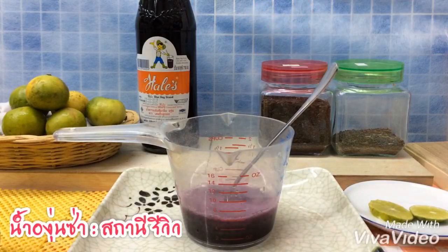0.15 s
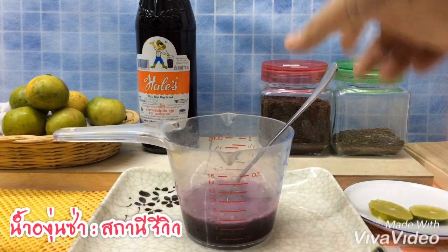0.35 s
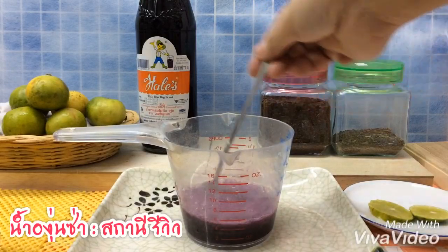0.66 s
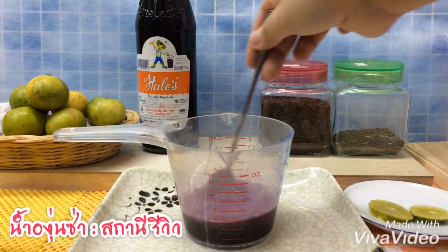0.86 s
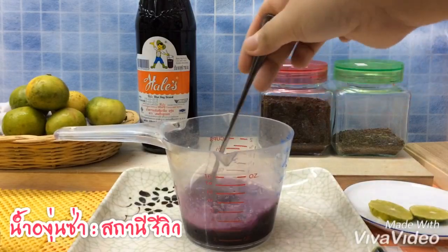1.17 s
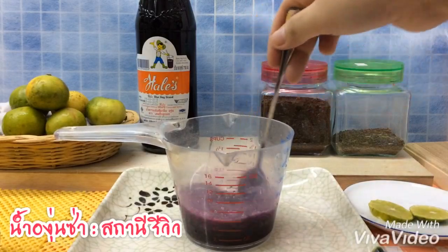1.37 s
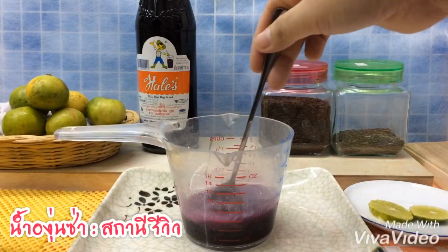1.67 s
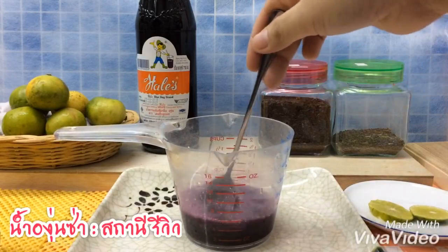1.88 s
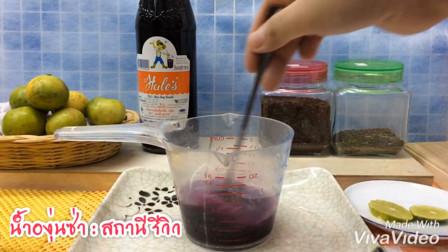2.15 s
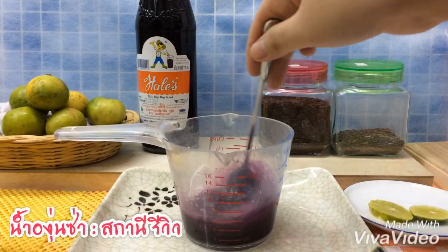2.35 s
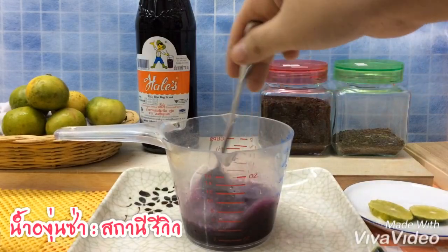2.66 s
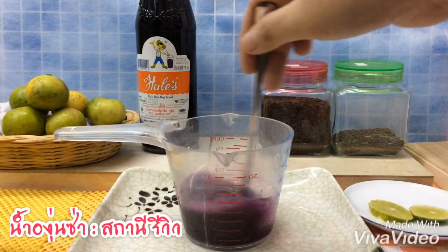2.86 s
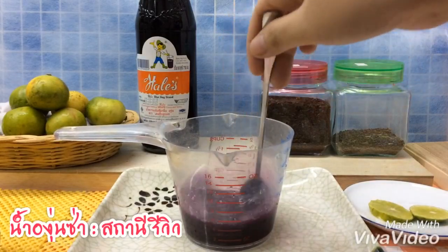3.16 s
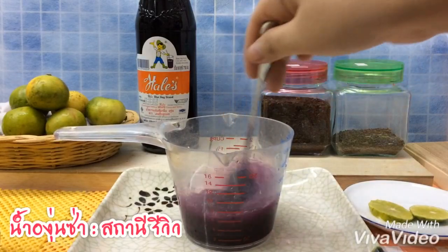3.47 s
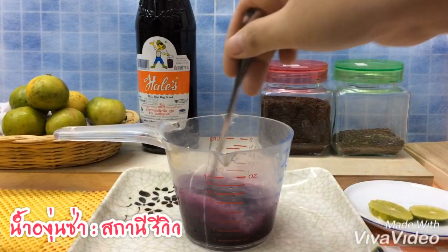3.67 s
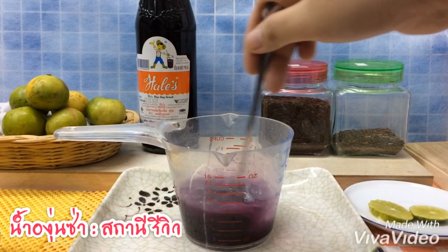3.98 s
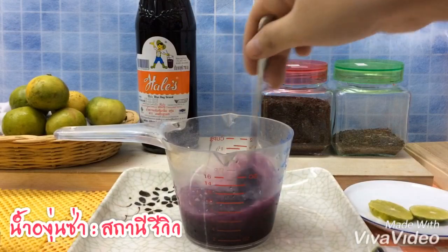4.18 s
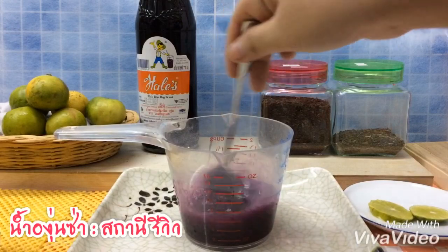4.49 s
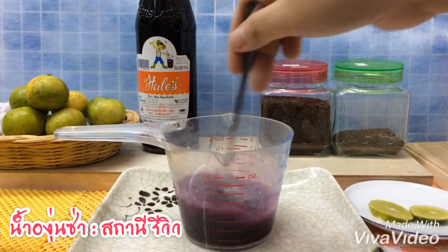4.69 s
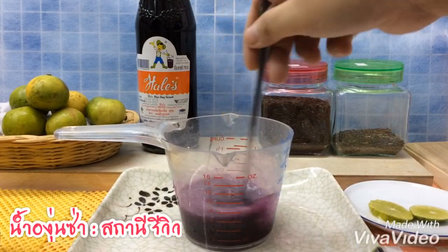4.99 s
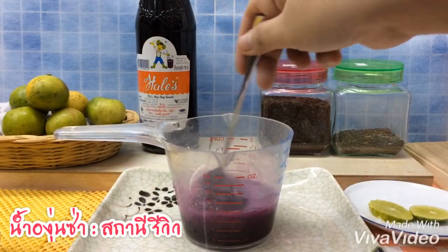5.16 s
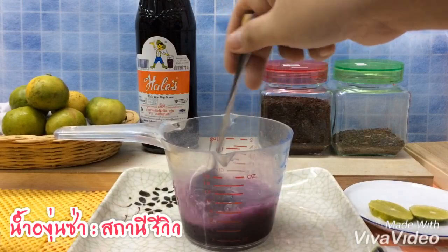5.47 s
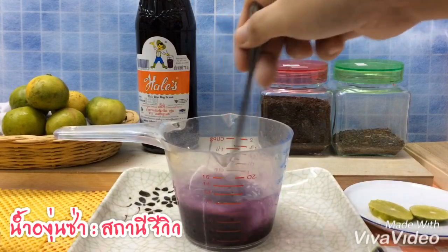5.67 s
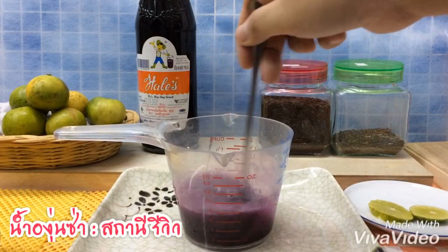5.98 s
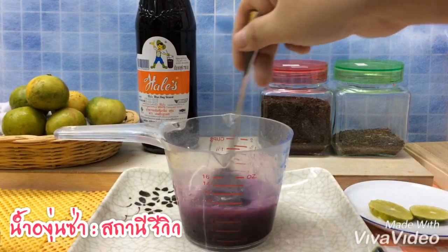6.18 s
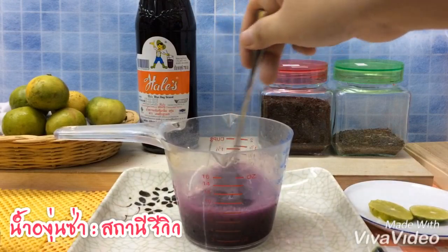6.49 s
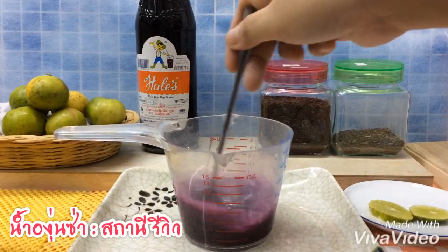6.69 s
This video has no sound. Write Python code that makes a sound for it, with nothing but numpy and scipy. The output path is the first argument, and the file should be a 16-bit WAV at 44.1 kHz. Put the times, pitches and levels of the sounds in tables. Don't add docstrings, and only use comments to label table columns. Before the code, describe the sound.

A close phone microphone in a tiled kitchen picks up deep, soft rumble and faint hiss. Nothing else stands out until about 0.7 s, when a long steel spoon is picked up: a bright, hard chink at 0.77 s, then quick, weaker ringing bounces and a scratchy slide until about 1 s. The spoon strikes the plastic jug at 1.0 and, harder, at 1.08 s, with a higher, dry clack. Stirring begins softly and unevenly, with a firmer knock at 2.53 s. From about 2.9 s it becomes steady, roughly six short drags per second, hollow and plasticky with liquid wash and gritty scraping. Irregular knocks and light taps ride on top, strong near 3.7, 4.06, 4.78, 5.42 (the loudest) and 6.77 s, with low tray thumps beneath. Tile reflections are brief. A faint distant motor hum rises after 6 s; stirring continues to the end, near 7 s.

```python
import sys
import numpy as np
from scipy import signal
from scipy.fft import rfft, irfft, next_fast_len
from scipy.io import wavfile

SR = 44100
rng = np.random.default_rng(int(sys.argv[2]) if len(sys.argv) > 2 else 0)


def master_out(mix):
    frames = np.transpose(np.atleast_2d(mix))
    ceiling = np.clip(frames, -1, 1)
    pcm = np.round(ceiling * 32767).astype(np.int16)
    wavfile.write(sys.argv[1], SR, pcm)


def field_ratio(decibels):
    return 10 ** (np.asarray(decibels, dtype=float) / 20)


N = 301644
RING_SAMPLES = 5000

# [f/Hz, density/dB per Hz]
RUMBLE = [(1.8, -17), (3.0, 2.5), (16, 5.5), (27, 2), (40, -4), (76, -21.5), (90, -37), (120, -62),
          (200, -120)]
# [f/Hz, density/dB per Hz]
HISS = [(41, -45), (70, -4.5), (101, 1.5), (170, -0.5), (204, -3.5), (240, -10.5), (301, -8.5),
        (345, -10.5), (1740, -20.5), (4440, -19.5), (7170, -14.5), (15200, -28.5), (16300, -28)]
# [f/Hz, level/dB rms]
MOTOR = [(157, -57), (195, -62.5)]
# [t/s, level/dB]
MOTOR_LEVEL = [
    (0, -18),
    (5.9, -22),
    (6.3, 0),
    (6.84, 3),
]

# [middle t/s,
# mouth level/dB, then base, wall, rasp levels/dB re mouth]
FIRST_STROKES = [(.71, -60.5, 1, 1, -15), (.84, -44.5, -9, -8.5, -5), (.95, -48.5, -5, 4, -12),
                 (1.13, -50.5, -3, 11, 2.5), (1.27, -48, -18, 2.5, -3), (1.45, -53, -3.5, 3.5, 1.5),
                 (1.57, -52.5, -7, -4, -4), (1.72, -57.5, -9, -8, -19), (1.98, -41, -19, -6.5, -13.5),
                 (2.14, -57.5, 1, 8.5, 5.5), (2.26, -45, -3.5, -1, -11.5), (2.35, -55, 3, 8, 4),
                 (2.53, -39, -4.5, -4, -12.5), (2.73, -49.5, -3, 2.5, -4)]
# [middle t/s, mouth level/dB, then base, wall, rasp levels/dB re mouth]
STROKES = [(2.89, -52, 0, 1, -1), (3.06, -45, -5, 0, -6), (3.26, -47, -6.5, -1, -5.5),
           (3.43, -44.5, -4, 1, -5.5), (3.62, -50.5, -1, 3.5, 0.5), (3.78, -38.5, -7, -7, -6.5),
           (3.95, -47.5, -5.5, -3.5, -4.5), (4.16, -39, -7.5, -2.5, -7), (4.33, -42.5, -5, -8.5, -6.5),
           (4.5, -43, -8, 1, -6), (4.69, -44, -5.5, -9.5, -8), (4.86, -43, -4, -4.5, -5.5),
           (5.04, -47, -7.5, -6.5, -6.5), (5.2, -41, -9, -3, -7), (5.34, -42, -10, -7.5, -7),
           (5.52, -39.5, -9.5, -7, -9.5), (5.67, -46.5, -7, -5.5, -2), (5.83, -38.5, -13, -8.5, -13),
           (6.0, -51.5, 0, -1, 1.5), (6.17, -38.5, -10, -6.5, -12.5), (6.33, -47, -5, -1, -4),
           (6.47, -41.5, -12, -9, -10.5), (6.58, -45.5, -7.5, -8, -8), (6.73, -40.5, -11, -8.5, -5)]
FIRST_STROKE_S, STROKE_S = 0.044, 0.059
SKIRT_DB, SKIRT_WIDER = -18, 2.2
# [f/Hz, level/dB, t60/s]
BASE = [(253, -11.5, 0.087), (336.4, -5.5, 0.16), (407.2, 6.5, 0.088), (484.2, 2, 0.13), (554.5, -8, 0.19)]
# [f/Hz, level/dB, t60/s]
MOUTH = [(825, -20.5, 0.13), (909, -11.5, 0.069), (963.7, 6, 0.045), (1012, -4.5, 0.042)]
# [f/Hz, level/dB, t60/s]
WALL = [(1305, 5, 0.039), (1440, 2, 0.056), (1574, 2, 0.033), (1748, -9, 0.063), (1966, -1, 0.018)]
# [f/Hz, level/dB, t60/s]
RIM = [(2362, -3, 0.099), (2530, -3, 0.11), (2796, -7, 0.053), (3660, -6.5, 0.046)]
# [f/Hz, density/dB per Hz]
WASH = [(250, -20), (500, -5.5), (1200, -3.5), (2000, -7), (3000, -13.5), (4500, -34.5)]
# [f/Hz, density/dB per Hz]
RASP = [(600, -12), (1500, -41), (2500, -1.5), (4000, -3.5), (6500, -0.5), (9000, -7.5), (13000, -15.5),
        (16000, -10)]

# [t/s, peak level/dB, then rattle, crack levels/dB re ring]
CHINKS = [
    (0.766, -16.5, -11, -7),
    (0.8187, -21.5, -1, 3),
    (0.8858, -24.5, -3.5, -14),
    (0.9537, -34, -2, -2),
]
# [f/Hz, level/dB, t60/s]
FIRST_RING = [(2035, -12, .06), (2874, 0, .26), (4700, -12, .16), (6298, -20, .12), (7181, -12, .06),
              (10850, -26, .08), (13625, -25, .12), (14170, -30, .06)]
# [f/Hz, level/dB, t60/s]
SECOND_RING = [(2870, -6, .1), (4290, -8, .1), (4690, -4, .15), (5426, -6, .1), (6282, -4, .16),
               (7155, -4, .12), (11660, -18, .12), (13610, -9, .1), (14170, -8, .1), (15150, -11, .12),
               (14560, -16, .06), (8667, -12, .06)]
# [f/Hz, level/dB, t60/s]
THIRD_RING = [(2110, -7, .3), (3693, -11, .2), (4660, -9, .2), (6272, 0, .2), (11700, -16, .12),
              (13610, -13, .11), (14170, -15, .1), (15200, -15, .12)]
# [f/Hz, level/dB, t60/s]
LAST_RING = [(2110, -2, .2), (6275, -8, .1), (7640, -8, .1), (11700, -6, .13), (13610, -9, .1),
             (15150, -10, .1)]
STEEL = [FIRST_RING, SECOND_RING, THIRD_RING, LAST_RING]
# [t/s, level/dB]
SLIDE = [
    (0.82, -54),
    (0.87, -40),
    (0.91, -54),
    (0.935, -32.5),
    (0.95, -49),
    (0.99, -48),
    (1.01, -60),
]
DIP_S = 1.0
# [f/Hz, density/dB per Hz]
RATTLE = [(500, -19.5), (900, -11.5), (2050, -4.5), (4100, -8), (6100, -9), (8500, -17), (12000, -38),
          (16000, -46)]
# [f/Hz, density/dB per Hz]
TICK = [(1500, -12), (3000, 1.5), (5700, 2.5), (8000, 2.5), (11000, -9), (16000, -10)]

# [t/s, mouth peak level/dB, then base, wall, tick levels/dB re mouth]
KNOCKS = [(1.003, -27, -6.5, -5, -15), (1.083, -19, -17, 5.5, -3.5), (1.246, -38.5, -3.5, -8, -2),
          (2.531, -23.5, -14, -5, -24), (2.574, -33, -9, 1.5, -18), (3.032, -26.5, -8.5, 0.5, -11.5),
          (3.356, -31, -5, 4, -2), (3.365, -26.5, -10.5, -2, -12), (3.708, -21.5, -12.5, 5.5, -9.5),
          (3.914, -35, -3, -5, -31), (4.059, -21.5, -26.5, -0.5, -18.5), (4.278, -34, -11, 8.5, -3.5),
          (4.617, -24.5, -20, -1.5, -13), (4.78, -14.5, -29, -2, -18.5), (5.11, -26, -32, 0.5, -32),
          (5.186, -26.5, -14, -6, -31), (5.423, -10.5, -29, -4, -20.5), (5.718, -20.5, -17.5, -8, -15),
          (5.955, -27.5, -22, -6.5, -9.5), (6.044, -23, -30, -9.5, -19), (6.372, -25.5, -11, -1, -9.5),
          (6.771, -15.5, -22, -3, -20)]
# [t/s, mouth peak level/dB, wall level/dB re mouth]
TAPS = [(1.275, -41.5, -6), (1.423, -40.5, -19), (1.533, -40.5, -1), (1.962, -43, -9), (1.988, -34.5, -22),
        (2.455, -34.5, -1.5), (2.845, -38.5, -0.5), (2.91, -38.5, -12), (2.946, -34, -6),
        (3.07, -31.5, -21), (3.794, -28.5, -3.5), (4.42, -40, 7), (4.491, -30.5, -3), (4.528, -29, -9),
        (4.564, -30, -27), (4.65, -36, -9), (4.849, -31, -6), (4.877, -32.5, -10), (4.961, -38.5, -1),
        (6.111, -48, -2), (6.214, -35.5, -21), (6.538, -34, -1)]
TAP_BASE_DB, TAP_TICK_DB = -16.5, -18.5
RIM_DB, RIM_FOLLOWS = -6.5, 0.47
BASE_DAMP_DB_PER_S = 300
MOUTH_DAMP_DB_PER_S = 250
# [t/s, level/dB]
HIGH_BLOWS = [
    (1.003, -32.5),
    (1.083, -14),
    (1.092, -18.5),
]
# [f/Hz, level/dB, t60/s]
DRY_WALL = [(475, -8.5, 0.12), (1430, -15, 0.1), (1550, -6, 0.064), (1710, 3.5, 0.082), (1850, -10.5, 0.16),
            (2053, 5, 0.045), (2180, -7.5, 0.1), (2820, -4.5, 0.071)]
# [t/s, peak level/dB]
THUMPS = [(1.001, -41), (1.084, -50.5), (1.52, -60), (2.537, -43), (2.85, -51), (3.03, -56), (3.709, -49),
          (3.919, -46), (4.067, -50), (4.279, -50.5), (4.599, -54), (4.781, -41.5), (5.108, -47.5),
          (5.197, -44.5), (5.425, -40), (5.724, -47.5), (6.375, -46.5), (6.765, -46)]
# (f/Hz, level/dB, t60/s)
TRAY = (128.7, 0, 0.39)
# [t/s, level/dB, f/Hz, t60/s]
BUMPS = [
    (1.528, -35.5, 230, 0.0086),
    (2.575, -39, 253, 0.1),
]

# [f/Hz, t60/s]
KITCHEN = [(150, 0.34), (1000, 0.14), (4000, 0.21), (12000, 0.082)]


def unit(x):
    return x / np.sqrt(np.mean(x ** 2) + 1e-20)


def along(points, hz):
    f, value = np.transpose(points)
    return np.interp(np.log(hz + 1), np.log(f + 1), value)


def level_curve(points):
    s, db = np.transpose(points)
    return np.interp(np.arange(N) / SR, s, db, left=-120)


def wobble(rate):
    knots = rng.standard_normal(int(N * rate / SR) + 2)
    return 1.2 * np.interp(np.arange(N) * rate / SR, np.arange(len(knots)), knots)


def coloured(x, spectrum):
    size = next_fast_len(len(x) + 1024)
    gain = field_ratio(along(spectrum, np.fft.rfftfreq(size, 1 / SR)))
    return unit(irfft(rfft(x, size) * gain, size)[:len(x)])


def ring(modes, scatter_db, detune, rise_s, damp_db=0):
    t = np.arange(RING_SAMPLES) / SR
    hz, db, t60 = np.transpose(modes)[:, :, None]
    strength, shift = rng.standard_normal((2, len(modes), 1))
    decay = field_ratio(db + scatter_db * strength - 60 * t / t60)
    tones = decay * np.sin(2 * np.pi * hz * (1 + detune * shift) * t)
    rise = 1 - np.exp(-t / rise_s)
    fade_out = np.cos(np.pi / 2 * t / t[-1])
    x = tones.sum(0) * rise * field_ratio(-damp_db * t) * fade_out
    return x / abs(x).max()


def burst(spectrum, t60):
    t = np.arange(RING_SAMPLES) / SR
    return coloured(rng.standard_normal(RING_SAMPLES), spectrum) * field_ratio(-60 * t / t60)


def add(track, s, x):
    track[round(s * SR):][:len(x)] += x


def background():
    t = np.arange(N) / SR
    rumble_db = -40 + 0.21 * t + 1.2 * wobble(5.6)
    rumble = field_ratio(rumble_db) * coloured(rng.standard_normal(N), RUMBLE)
    motor = np.zeros(N)
    for hz, db in MOTOR:
        motor += field_ratio(db + 3 + 1.5 * wobble(6)) * np.sin(2 * np.pi * hz * t)
    hiss = field_ratio(-55 + 0.12 * wobble(21)) * coloured(rng.standard_normal(N), HISS)
    return rumble + field_ratio(level_curve(MOTOR_LEVEL)) * motor + hiss


def pressure():
    t, power = np.arange(0, N / SR + .01, .005), 0
    for strokes, spread_s in [(FIRST_STROKES, FIRST_STROKE_S), (STROKES, STROKE_S)]:
        s, db, *parts_db = np.transpose(strokes)
        levels = field_ratio([db, *(db + np.array(parts_db))])
        off = ((t - s[:, None]) / spread_s) ** 2
        press = np.exp(-off) + field_ratio(2 * SKIRT_DB) * np.exp(-off / SKIRT_WIDER ** 2)
        power = power + levels ** 2 @ press
    return [np.interp(np.arange(N) / SR, t, np.sqrt(p)) for p in power]


def drag(step=SR // 10):
    mouth, base, wall, rasp = pressure()
    out, clumps = np.zeros(N + SR), wobble(35)
    fade = np.sin(np.pi * np.arange(2 * step) / (2 * step))
    parts = [(MOUTH, mouth, 40), (BASE, base, 250), (WALL, wall * field_ratio(-2.5), 500), (RIM, wall * field_ratio(-10), 900)]
    for part, level, damp_db in parts:
        slip_db = 2.4 * clumps + 3.4 * wobble(50) + 4.2 * wobble(250)
        slips = unit(rng.standard_normal(N) * field_ratio(slip_db)) * level * field_ratio(-2.5)
        for k in range(5 * step, N, step):
            answer = ring(part, scatter_db=5, detune=.028, rise_s=.001, damp_db=damp_db)
            stretch = slips[k:k + 2 * step] * fade[:N - k]
            add(out, k / SR, signal.fftconvolve(stretch, answer / np.linalg.norm(answer)))
    wash_db = 0.92 * clumps + 1.3 * wobble(200)
    wash = coloured(rng.standard_normal(N) * field_ratio(wash_db), WASH)
    grit_db = 2.0 * clumps + 2.0 * wobble(60) + 1.6 * wobble(900)
    grit = coloured(rng.standard_normal(N) * field_ratio(grit_db), RASP)
    return out[:N] + field_ratio(-6.0) * wall * wash + field_ratio(-2.5) * rasp * grit


def spoon():
    out, t = np.zeros(N + SR), np.arange(RING_SAMPLES) / SR
    gaps = np.append(np.diff(np.transpose(CHINKS)[0]), .05)
    for (s, db, rattle_db, crack_db), modes, gap in zip(CHINKS, STEEL, gaps):
        damping = field_ratio(-800 * np.maximum(t - gap, 0))
        bar = ring(modes, scatter_db=1.0, detune=0, rise_s=0.00027) * damping
        crack = field_ratio(crack_db) * burst(TICK, 0.0026)
        rattle = field_ratio(rattle_db) * burst(RATTLE, 0.12)
        add(out, s, field_ratio(db) * (bar + crack + rattle))
    scuff_db = 2.3 * wobble(150) + 3 * wobble(700)
    scuff = coloured(rng.standard_normal(N) * field_ratio(scuff_db), RATTLE)
    slide_db = np.where(np.arange(N) < DIP_S * SR, level_curve(SLIDE), -120)
    return out[:N] + field_ratio(slide_db) * scuff


def blow(out, s, db, base_db, wall_db, tick_db):
    t = np.arange(RING_SAMPLES // 3) / SR
    rim_db = RIM_DB + RIM_FOLLOWS * (wall_db + tick_db)
    tick = burst(TICK, 0.017) + field_ratio(-7.0) * burst(RATTLE, 0.13)
    add(out, s - .001, field_ratio(db + tick_db + 0.5) * tick)
    add(out, s, field_ratio(db + wall_db - 14) * burst(WASH, 0.11))
    add(out, s, field_ratio(db + rim_db - 9.5) * burst(RATTLE, 0.11))
    parts = [(MOUTH, 0, .003, MOUTH_DAMP_DB_PER_S), (BASE, base_db, .003, BASE_DAMP_DB_PER_S),
             (WALL, wall_db, .0012, 0), (RIM, rim_db, .0008, 0)]
    for part, level_db, rise_s, damp_db in parts:
        chatter = rng.standard_normal(len(t)) * field_ratio(-60 * t / 0.028)
        chatter[0] = field_ratio(0.82 * db + 40.0)
        answer = ring(part, scatter_db=3, detune=.016, rise_s=rise_s, damp_db=damp_db)
        rung = signal.fftconvolve(chatter, answer)
        add(out, s - .001, field_ratio(db + level_db + 0.5) * rung / abs(rung).max())


def knocks():
    out = np.zeros(N + SR)
    for s, db, base_db, wall_db, tick_db in KNOCKS:
        blow(out, s, db, base_db, wall_db, tick_db)
    for s, db, wall_db in TAPS:
        blow(out, s, db, TAP_BASE_DB, wall_db, TAP_TICK_DB)
    for s, db in HIGH_BLOWS:
        add(out, s - .001, field_ratio(db) * ring(DRY_WALL, scatter_db=3.5, detune=0.0057, rise_s=0.00081))
    for s, db in THUMPS:
        add(out, s, field_ratio(db + 0.5) * ring([TRAY], scatter_db=0, detune=0.0068, rise_s=0.01))
    for s, db, hz, t60 in BUMPS:
        add(out, s, -field_ratio(db) * ring([(hz, 0, t60)], scatter_db=0, detune=0, rise_s=.0004))
    return out[:N]


def kitchen(x, spread_s=.22):
    out, step = np.zeros(N + SR), round(spread_s * SR)
    for k in range(0, N, step):
        hz, t, z = signal.stft(rng.standard_normal(SR // 3), SR, nperseg=256)
        decay = field_ratio(-60 * t / along(KITCHEN, hz)[:, None])
        tail = signal.istft(z * decay, SR, nperseg=256)[1]
        add(out, k / SR + .008, signal.fftconvolve(x[k:k + step], tail / np.linalg.norm(tail)))
    return out[:N]


def scene():
    room = background()
    jug = drag()
    handle = spoon()
    jug = jug + knocks()
    echo = kitchen(field_ratio(-11.5) * handle + field_ratio(-10) * jug)
    return (handle + jug + echo + room)[None]


def band_limit(x):
    return signal.sosfilt(signal.butter(12, 16820, fs=SR, output="sos"), x)


def record(dry):
    passed = np.fft.rfftfreq(N, 1 / SR) < 15870
    mix = irfft(rfft(dry) * passed, N)
    return band_limit(mix)


dry = scene()
out = record(dry)
master_out(out)
```